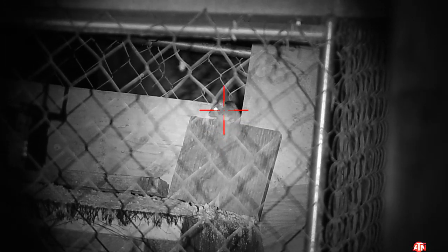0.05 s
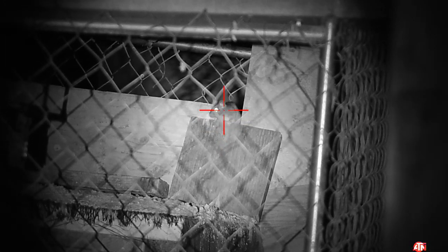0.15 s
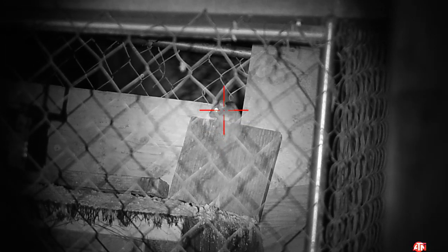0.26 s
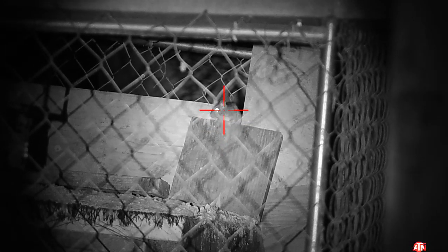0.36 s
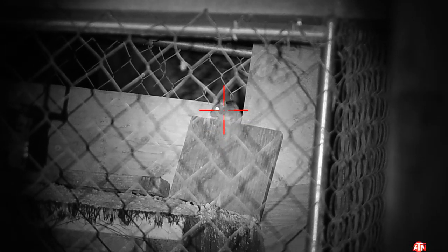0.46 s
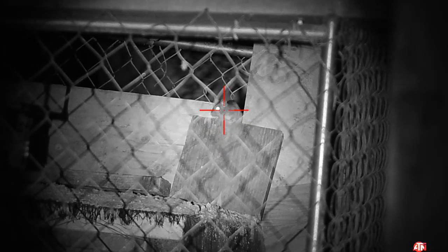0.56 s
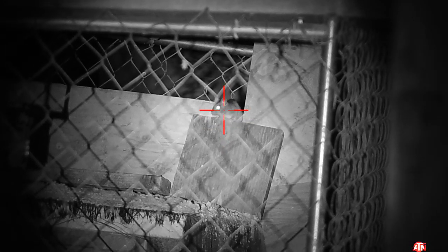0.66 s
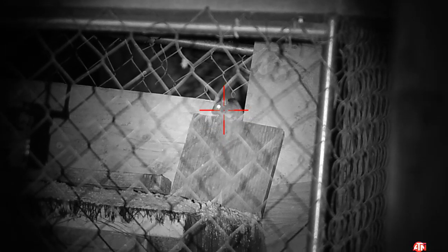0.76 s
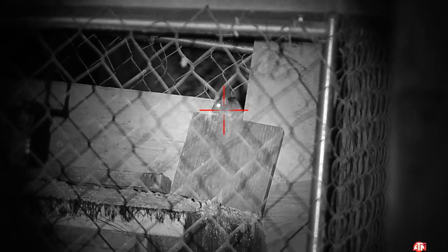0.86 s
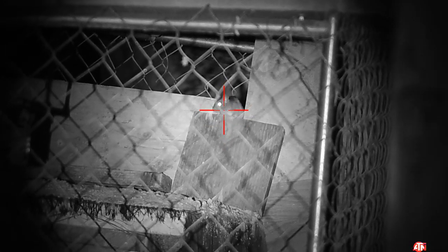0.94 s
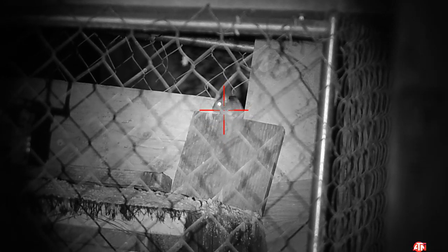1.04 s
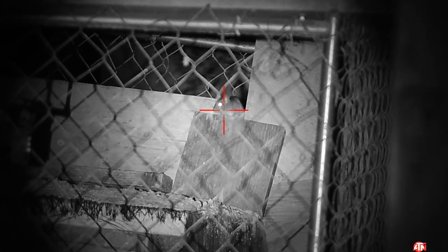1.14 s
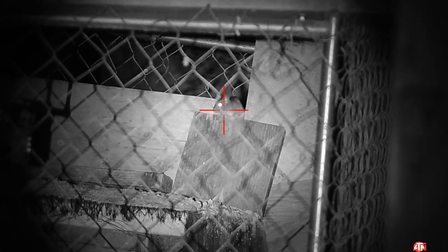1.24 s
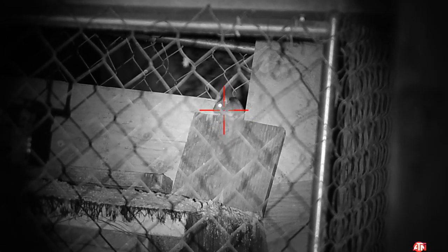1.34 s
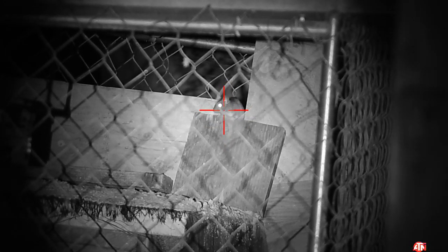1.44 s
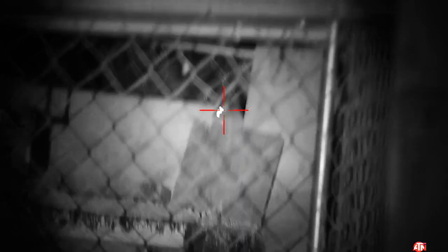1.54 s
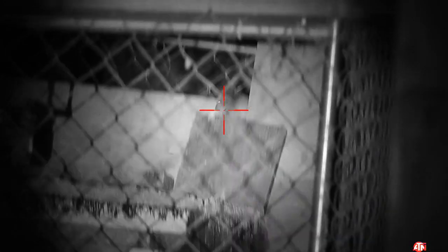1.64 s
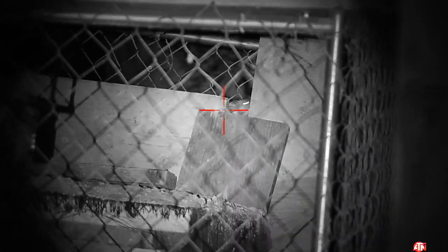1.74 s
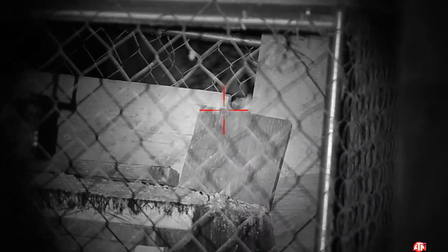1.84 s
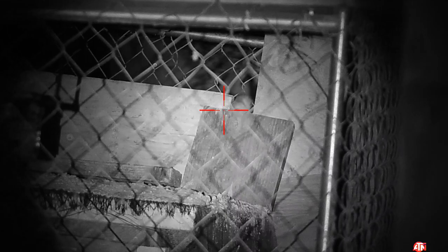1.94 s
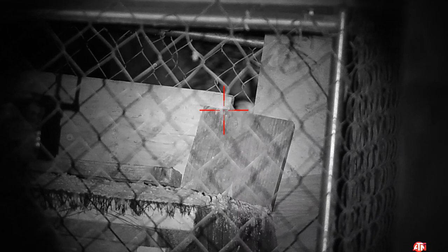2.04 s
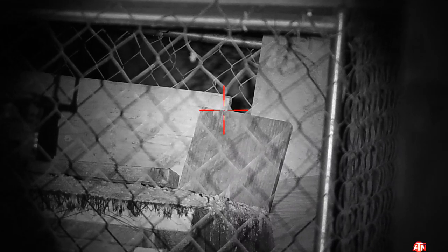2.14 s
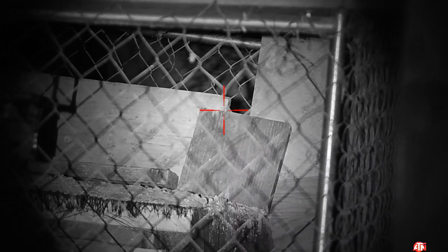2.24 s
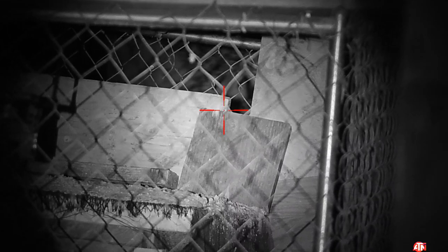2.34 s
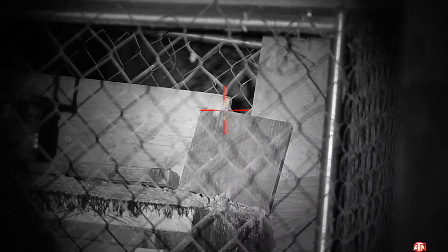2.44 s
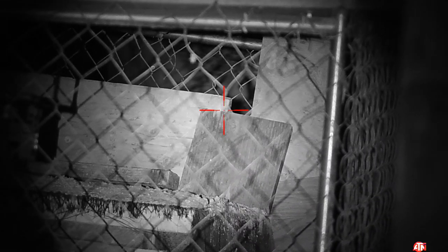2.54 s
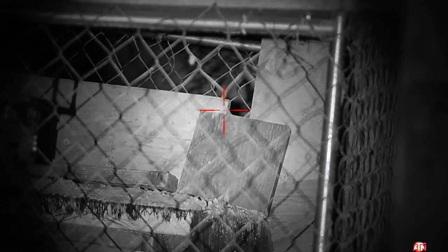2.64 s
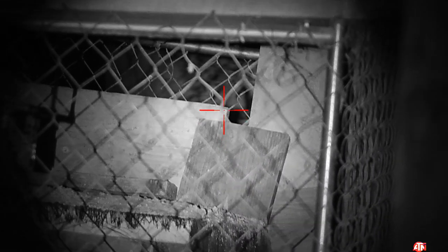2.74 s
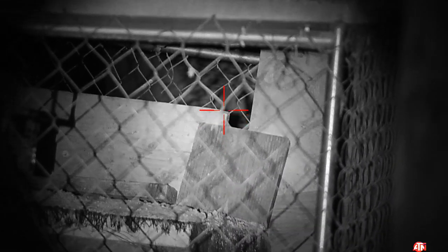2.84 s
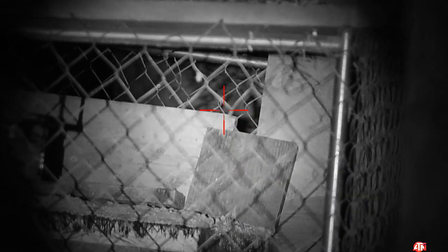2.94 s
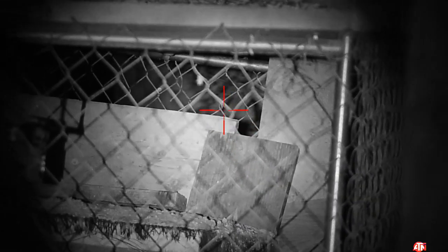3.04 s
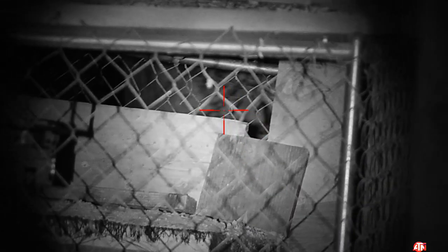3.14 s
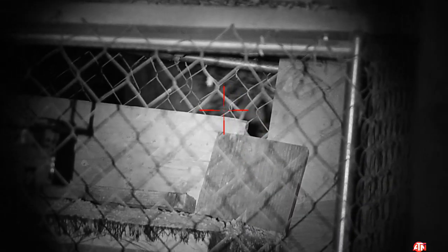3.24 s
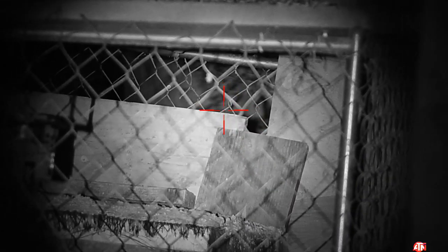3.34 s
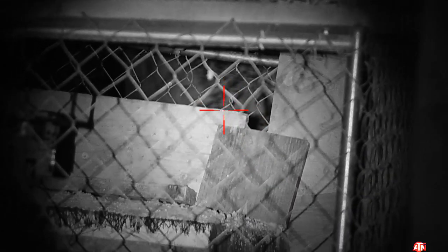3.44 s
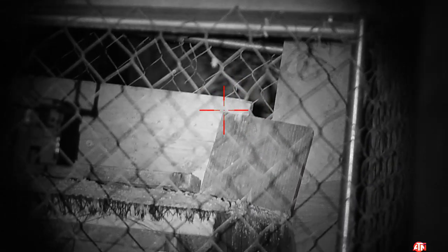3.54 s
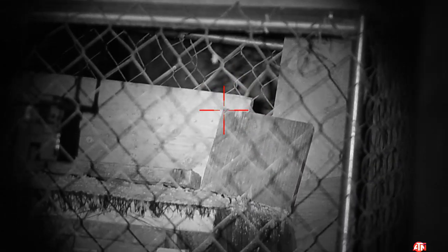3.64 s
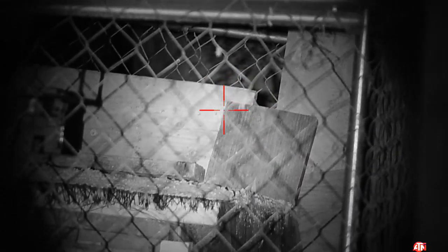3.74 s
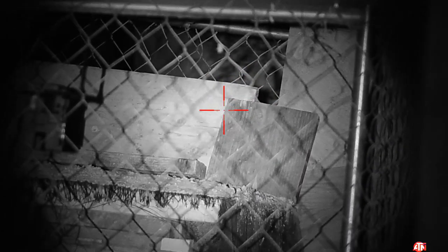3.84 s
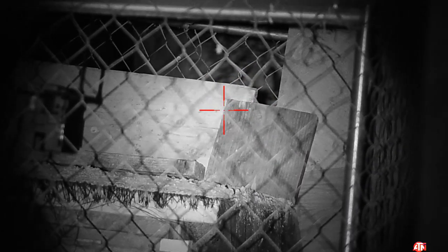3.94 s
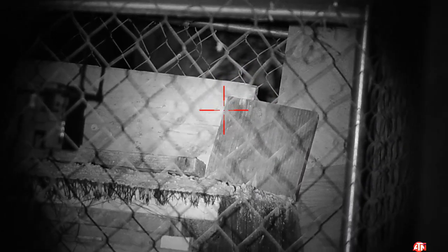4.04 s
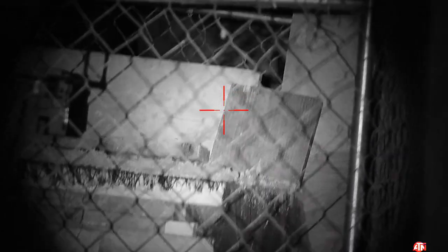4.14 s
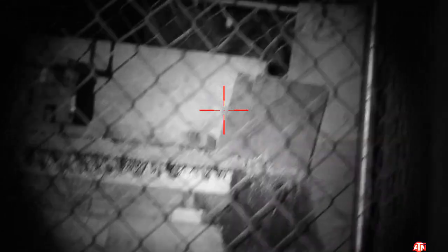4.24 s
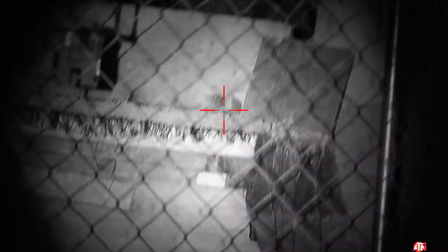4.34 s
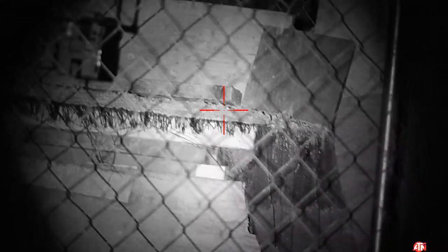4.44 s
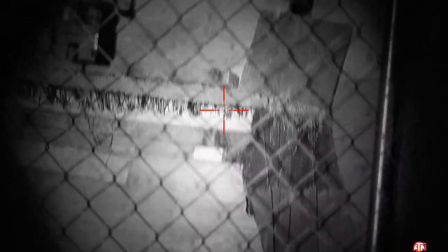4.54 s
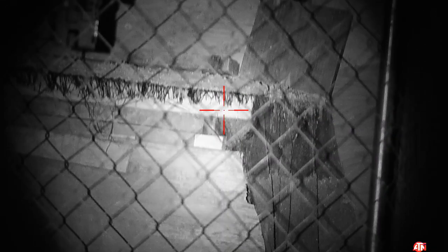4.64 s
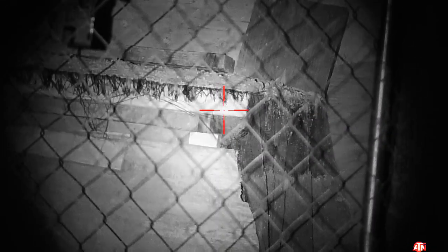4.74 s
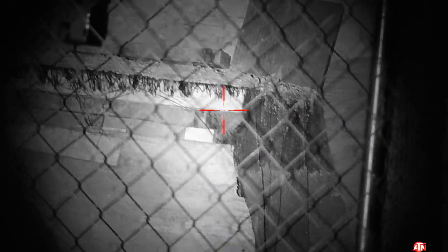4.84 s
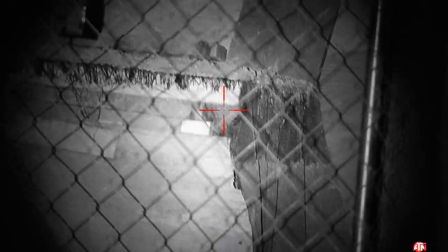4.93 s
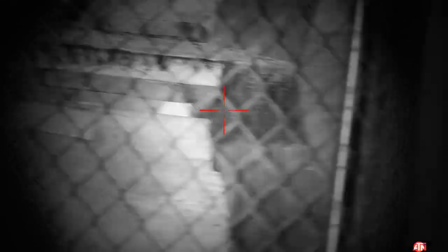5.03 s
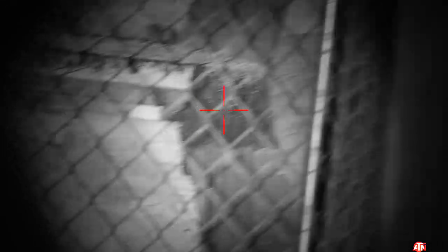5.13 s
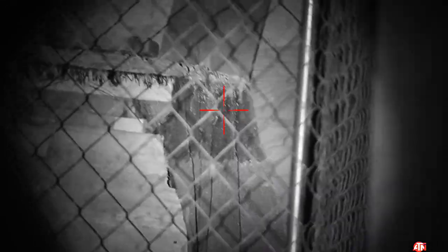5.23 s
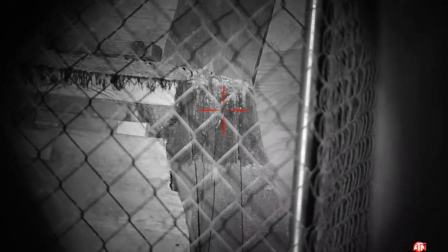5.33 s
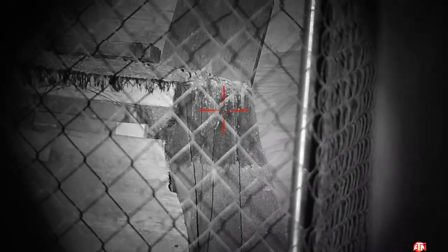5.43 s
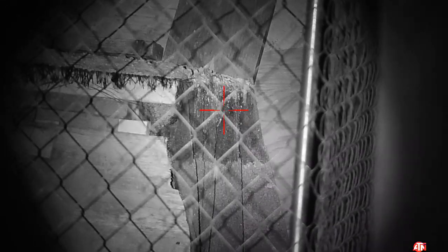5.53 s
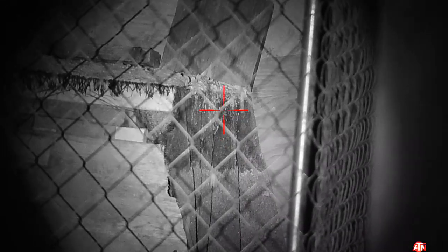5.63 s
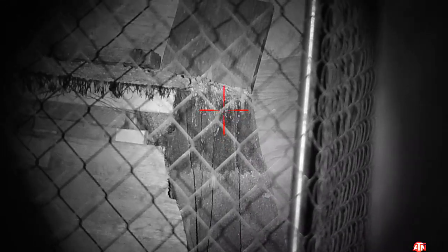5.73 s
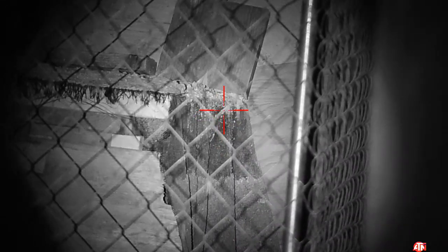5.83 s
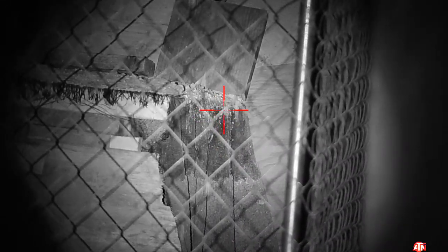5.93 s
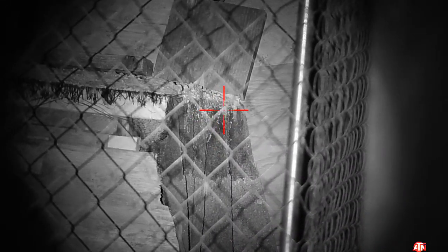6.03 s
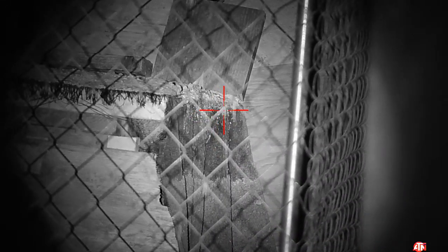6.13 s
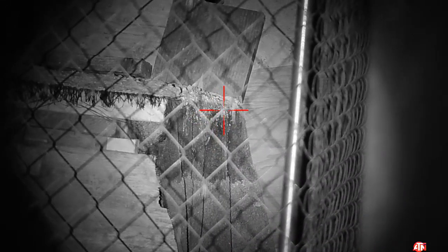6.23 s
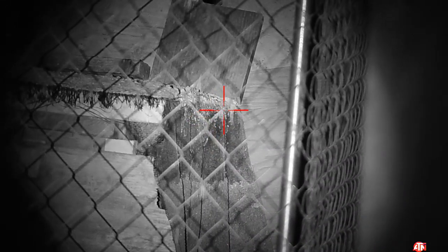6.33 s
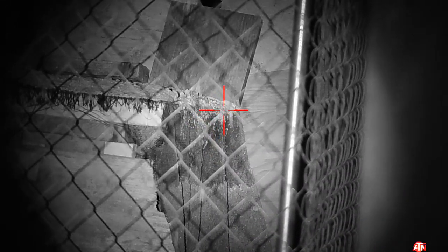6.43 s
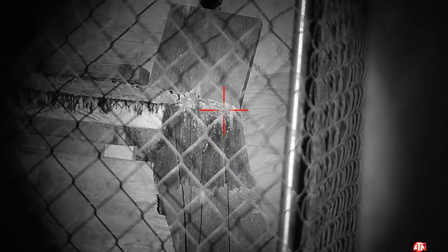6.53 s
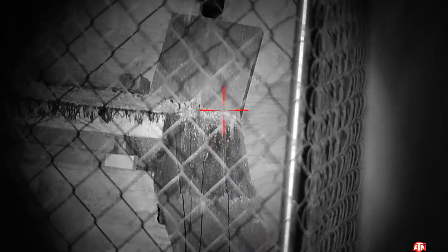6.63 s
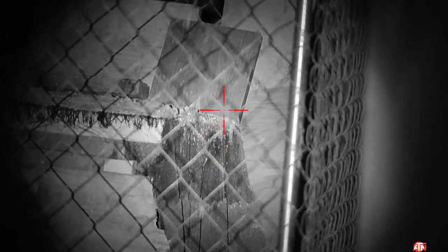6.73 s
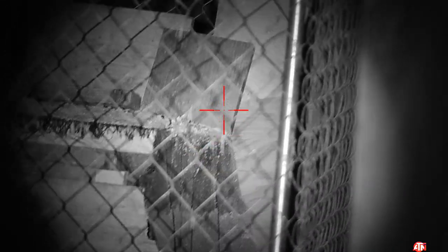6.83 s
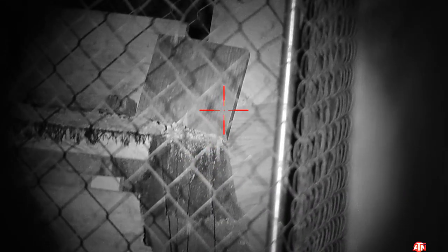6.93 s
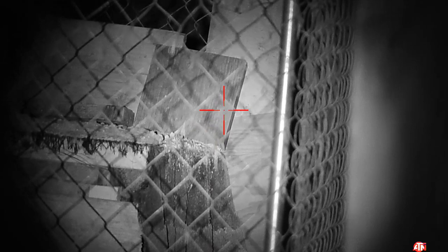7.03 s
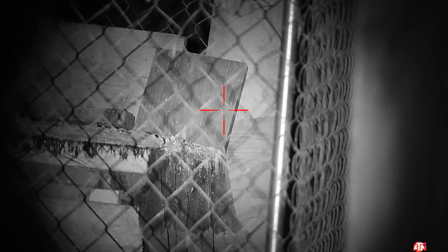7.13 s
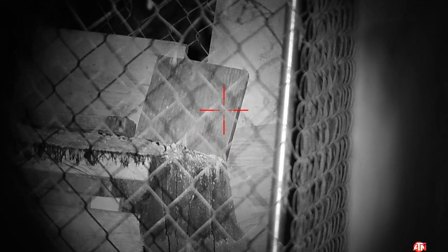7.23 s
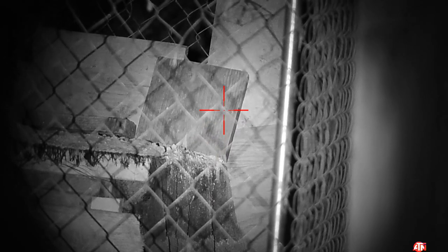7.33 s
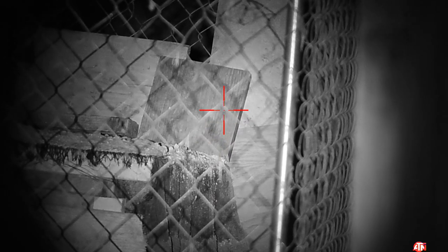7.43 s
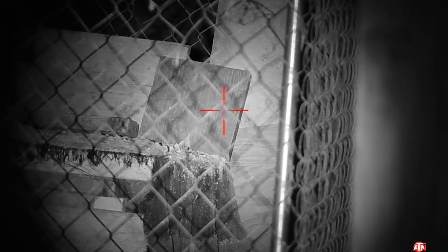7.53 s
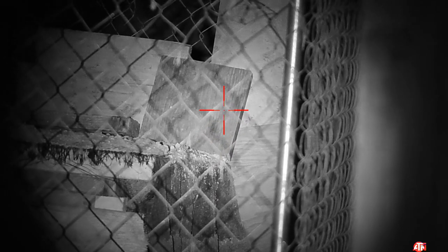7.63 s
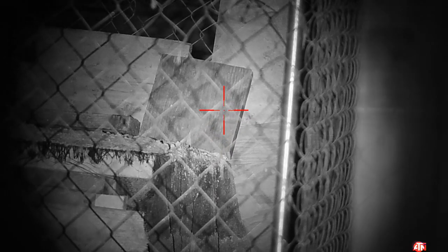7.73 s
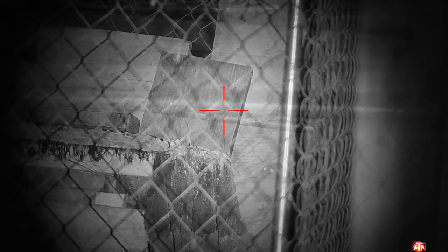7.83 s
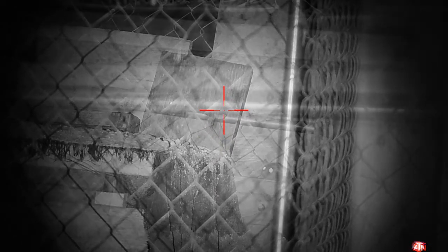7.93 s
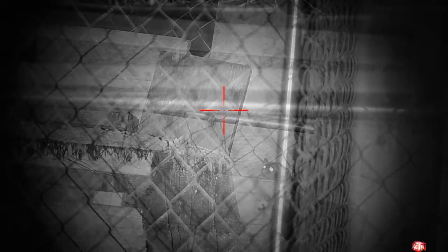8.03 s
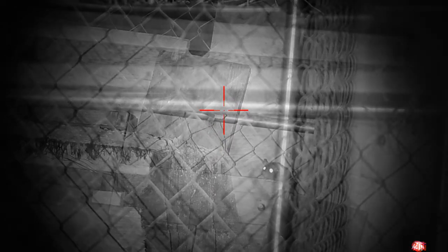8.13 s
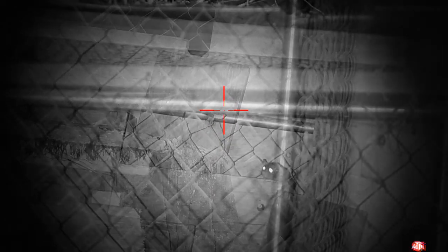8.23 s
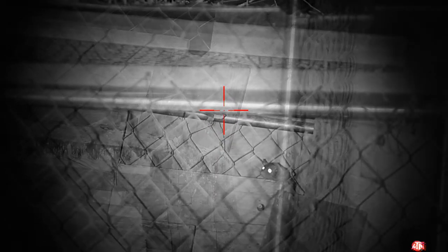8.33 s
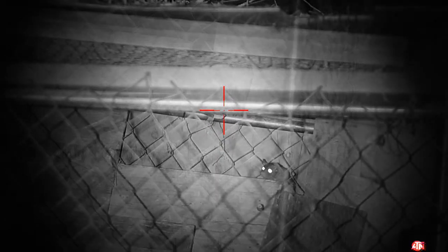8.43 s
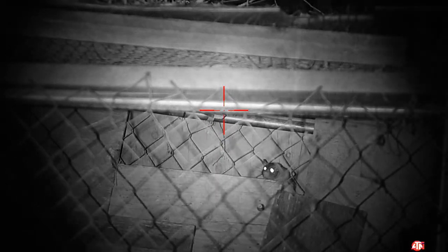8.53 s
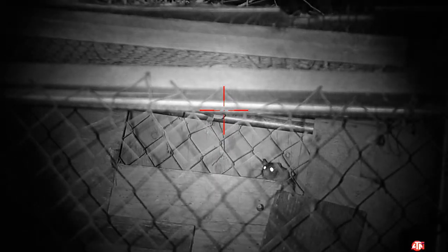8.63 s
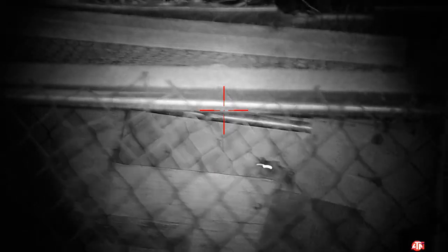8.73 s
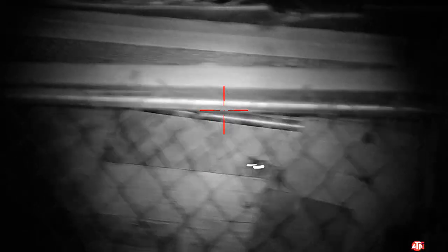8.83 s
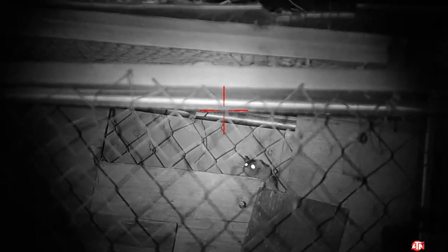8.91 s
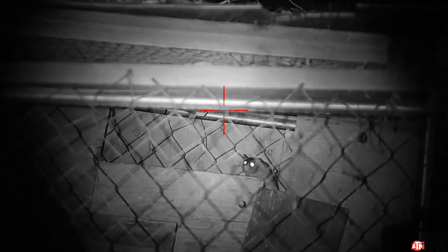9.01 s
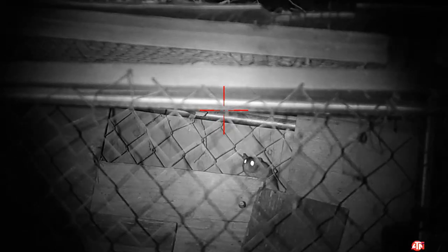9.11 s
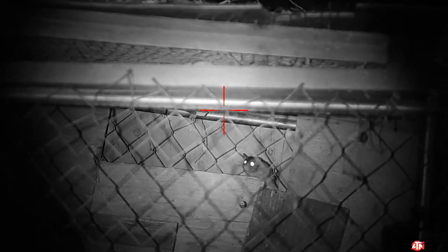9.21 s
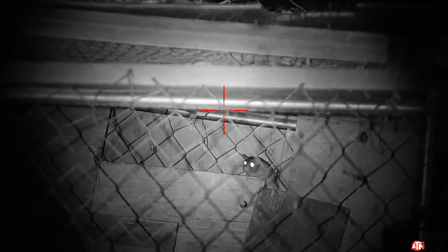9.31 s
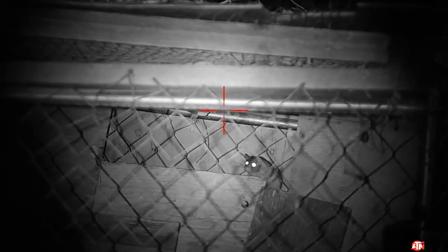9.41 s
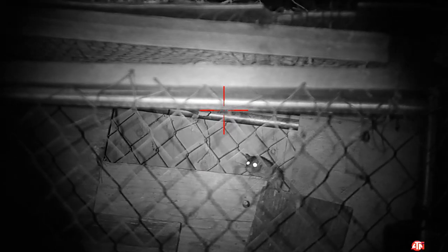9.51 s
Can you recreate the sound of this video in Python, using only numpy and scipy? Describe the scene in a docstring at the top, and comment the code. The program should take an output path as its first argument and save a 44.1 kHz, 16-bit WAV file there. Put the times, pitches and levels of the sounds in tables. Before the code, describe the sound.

One sharp air rifle shot with a brief metal rattle and a soft echo, over crickets chirping steadily at night.

```python
"""Crickets chirp and trill in a farmyard at night, each wing stroke a short tone; two katydids rasp
out of step. At 1.7 s an air rifle fires: a sharp crack of released air, then a short steel rattle as
the hammer bounces ever faster. Echo from the surroundings swells and dies with two faint ringing tones.
The insects carry on throughout, over night air and a few soft knocks."""
import sys
import numpy as np
from scipy import signal
from scipy.fft import rfft, irfft, next_fast_len
from scipy.io import wavfile

SR = 44100
rng = np.random.default_rng(int(sys.argv[2]) if len(sys.argv) > 2 else 0)


def wrap_up_sound(samples):
    """Save the sound to the file named by the first command line argument, as 16-bit audio."""
    columns = np.atleast_2d(samples).T
    # keep every value between -1 and 1, then stretch to whole-number steps
    tamed = np.clip(columns, -1, 1)
    steps = np.round(tamed * 32767).astype(np.int16)
    wavfile.write(sys.argv[1], SR, steps)


N = 422037
TIME = np.arange(N) / SR

# hammer and valve blows (time [s], level [dB], dull crack re ring [dB])
ACTION_BLOWS = [(1.7111, -24, 2), (1.7152, -17.5, -24), (1.7185, -18, 1.5), (1.924, -38, -19)]
# rifle modes (frequency [Hz], width [Hz], relative level [dB])
STEEL_MODES = [(4436, 310, 1), (4810, 380, -10), (5780, 440, -6.5), (7040, 370, -16.5), (9900, 240, -21.5)]
# crack (frequency [Hz], relative level [dB])
CRACK_SPECTRUM = [(150, -37.5), (330, -18.5), (680, -0.5), (1000, -6), (1450, -2), (2100, -6.5), (3200, -3),
                  (4400, 0.5), (5600, 0.5), (6500, -2), (7500, -4), (8500, -7.5), (11000, -12.5),
                  (16000, -31)]
# echo (frequency [Hz], relative level [dB])
ECHO_SPECTRUM = [(150, -28), (330, -2.5), (600, -3.5), (1200, -2.5), (2400, 2.5), (4400, 3.5), (5500, -9.5),
                 (7000, -22.5), (10000, -34)]
# tones in the echo (pitch [Hz], peak time [s], level [dB], fade [dB/s])
ECHO_TONES = [(377, 2.03, -61.5, 90), (1020, 2.13, -52, 76)]
# field cricket by the sheds (first stroke [s], strokes [count], level before trim [dB])
CLEAR_SONG = [(.461, 2, -41.5), (.93, 2, -42), (1.865, 2, -43), (2.313, 3, -42), (2.783, 3, -42.5),
              (3.232, 3, -44), (3.854, 3, -42.5), (4.64, 3, -41), (5.189, 3, -43), (5.801, 2, -42.5),
              (6.252, 2, -42.5), (6.771, 3, -42.5), (7.864, 3, -42), (8.352, 3, -42), (8.814, 3, -42)]
# cricket in the open (first stroke [s], strokes [count], level [dB], growth [dB/stroke], overtone [dB])
BUZZY_SONG = [(.155, 3, -49.5, -0.5, -24), (.373, 2, -49.5, 3, -11), (.569, 2, -49.5, -1, -24),
              (.86, 2, -49, 1, -22), (1.026, 1, -45.5, 0, -28), (1.243, 3, -51.5, 2, -22),
              (1.378, 2, -46.5, 0, -9.5), (3.59, 2, -49, 0, -18), (4.941, 2, -47.5, 4, -11),
              (5.054, 2, -42, 3, -25), (5.573, 3, -49, 0, -11), (7.088, 3, -51.5, 4, -14),
              (7.69, 1, -43, 0, -25), (7.967, 1, -43, 0, -24), (8.435, 2, -43, 0, -22),
              (8.983, 2, -49, 0, -13), (9.247, 3, -43.5, 5.5, -20)]
# unbroken trills (rate [strokes/s], pitch [Hz], fall [Hz], stroke length [s], level [dB],
# tempo wander [ratio], flutter [dB], reflections [dB])
TRILL_VOICES = [(80.3, 6140, 700, 0.01, -57, .004, 0.86, -10.5),
                (49.66, 3945, 130, 0.015, -60, .004, 1.5, -10.5),
                (47.2, 3740, 460, .017, -68, .03, 1.5, -4.5), (40, 2600, 150.7, .02, -76, .06, 3., -3.5)]
# tree cricket pace (time [s], chirp period [s])
TREE_PACE = [(1.8, .3715), (3.0, .3797)]
# high crickets (rate [pips/s], top pitch [Hz], pitch arch [Hz], level [dB])
HIGH_VOICES = [(13.1, 7305, 120, -73), (14, 7060, 380, -68)]
# katydids (start phase [cycles], level [dB])
KATYDID_VOICES = [(.2, -58.5), (.34, -60.4)]
# katydid pace (time [s], first [rasps/s], second [rasps/s])
KATYDID_PACE = [(0.0, 13.13, 11.72), (1.9, 12.45, 11.61), (3.8, 12.37, 11.6), (5.7, 13.35, 11.64),
                (7.6, 13.25, 11.32), (9.5, 13.14, 11.9)]
# katydid rasp (frequency [Hz], relative level [dB])
RASP_SPECTRUM = [(7500, -33), (9000, -15.5), (10000, -7), (11000, -2), (12500, -1), (14000, 0.5),
                 (15200, -2), (16000, -8)]
# taps and bumps (time [s], level before trim [dB], centre [Hz], decay [s])
KNOCK_EVENTS = [(.193, -58.5, 1800, 0.01), (.446, -68.5, 1500, 0.015), (.53, -70, 2000, 0.028),
                (1.33, -69, 50, 0.061), (2.612, -61.5, 383, 0.017), (5.15, -54.5, 80, .03),
                (5.236, -54, 65, 0.024), (5.48, -69.5, 55, 0.065), (5.84, -60.5, 70, 0.029),
                (6.24, -73, 50.1, .1), (7.94, -73, 69.6, 0.2), (9.39, -71, 50.1, 0.064)]
# far insect bands (centre [Hz], width [Hz], level [dB])
CHORUS_BANDS = [(3628, 460, -67.5), (3986, 260, -65), (4650, 500, -67), (5380, 870, -64.5),
                (6170, 740, -62), (6990, 500, -69), (8020, 380, -75), (9450, 400, -79)]
# puffs of lisping hiss (peak time [s], level [dB])
LISP_PUFFS = [(3.07, -62), (3.35, -59), (3.49, -60), (3.63, -59)]
# night air (frequency [Hz], relative level [dB])
AIR_SPECTRUM = [(20, -34), (40, -23), (65, -7), (110, 1.5), (160, -4), (250, -11), (500, -15), (1000, -18),
                (2000, -19), (5000, -14), (9000, -13), (12000, -11.5), (15500, -17.5)]


def rifle(low_cut_hz=325, squeak_hz=3020, squeak_db=-58, lead_in_hiss_db=-52):
    """A faint squeak over a soft rising hiss, then the shot; the small bore radiates no bass."""
    out = muzzle() + action()
    add(out, 1.663, amp(squeak_db) * stroke(squeak_hz, fall_hz=-150, length_s=.046))
    rise = np.sqrt(np.linspace(0, 1, round(.058 * SR)))
    add(out, 1.653, amp(lead_in_hiss_db) * rise * coloured(CRACK_SPECTRUM)[:len(rise)])
    return signal.sosfilt(signal.butter(6, low_cut_hz, "high", fs=SR, output="sos"), out)


def muzzle(at_s=1.7121, crack_db=-12.5, length_s=.00304, push_db=-8, push_hz=1000, push_s=.00046,
           whistle_hz=7400, whistle_db=-13.5):
    """Air burst: one pressure swing, then brief jet noise that whistles in the muzzle."""
    t, out = np.arange(SR // 20) / SR, np.zeros(N)
    envelope = (1 - np.exp(-t / .0002)) * np.exp(-(t / length_s) ** 4)
    phase = np.angle(rfft(coloured(CRACK_SPECTRUM)[:len(t)] * envelope))
    magnitude = spectrum_gain(CRACK_SPECTRUM, np.fft.rfftfreq(len(t), 1 / SR))
    jet = irfft(magnitude * np.exp(1j * phase), len(t)) * np.sqrt(envelope)  # fills every band
    add(out, at_s, amp(crack_db) * jet * np.linalg.norm(envelope) / np.linalg.norm(jet))
    from_peak_s = t - 2 * push_s
    push = np.exp(-(from_peak_s / push_s) ** 2) * np.cos(2 * np.pi * push_hz * from_peak_s)
    add(out, at_s - .0004, -amp(push_db) * push)
    add(out, at_s + .00066, amp(whistle_db) * stroke(whistle_hz, 0, length_s))
    return out


def action(hard_rise_s=.00059, hard_db=-18, softening=.35, contact_s=.0024, scrape_db=-13):
    """Hammer and valve strike, then chatter; all ring the same steel, weak blows with a rounder attack."""
    t, out, crack = np.arange(SR // 20) / SR, np.zeros(N), coloured(CRACK_SPECTRUM)
    touch = np.exp(-(t / contact_s) ** 2)
    for s, db, dull_db in ACTION_BLOWS + bounces():
        rise_s = hard_rise_s * amp(softening * (hard_db - db))
        onset = 1 - np.exp(-(t / rise_s) ** 2)
        phases = 2 * np.pi * rng.random(len(STEEL_MODES))
        ring = sum(amp(mode_db) * np.exp(-np.pi * width_hz * t) * np.sin(2 * np.pi * hz * t + phase)
                   for (hz, width_hz, mode_db), phase in zip(STEEL_MODES, phases))
        scrape = signal.fftconvolve(touch * rng.standard_normal(len(t)), ring)[:len(t)]
        dull = touch * crack[round(s * SR):][:len(t)]
        blow = unit(onset * ring) + amp(scrape_db) * unit(scrape) + amp(dull_db) * unit(dull)
        add(out, s, amp(db) * blow * np.sqrt(contact_s / t[-1]))
    return out


def bounces(start_s=1.7312, gap_s=.0072, shrink=.877, top_db=-33.3, ends_db=-3.5, dull_db=-18, count=10):
    """Quickening hammer bounces, strongest mid-run; rows as in ACTION_BLOWS."""
    gaps_s = gap_s * shrink ** np.arange(count)
    times_s = start_s + np.cumsum(gaps_s) - gaps_s
    return [(s, top_db + ends_db * u ** 2, dull_db) for s, u in zip(times_s, np.linspace(-1, 1, count))]


def echo(start_s=1.757, peak_s=2.165, peak_db=-41.5, ground_db=-51,
         thin_until_s=2.13, filling_s=.17, dulling_s=.38, patchy_db=.85):
    """The shot returns off nearby ground, then ever more surfaces; late returns lose their treble."""
    wash = coloured(ECHO_SPECTRUM)
    near = np.clip((thin_until_s - TIME) / filling_s, 0, 1)  # thin returns off grass and wire
    wash = np.sqrt(1 - near) * wash + np.sqrt(near) * unit(band(coloured(ECHO_SPECTRUM), 800, 9000))
    far = np.clip((TIME - thin_until_s) / dulling_s, 0, 1)
    wash = np.sqrt(1 - far) * wash + np.sqrt(far) * unit(band(coloured(ECHO_SPECTRUM), 216, 2230))
    shot_s = ACTION_BLOWS[0][0]
    ground = amp(ground_db) * swell(shot_s, shot_s + .0101, fade_db_per_s=190)
    surfaces = amp(peak_db) * swell(start_s, peak_s, fade_db_per_s=57.5)
    tones = sum(amp(db) * swell(start_s, s, fade) * np.sin(2 * np.pi * hz * TIME)
                for hz, s, db, fade in ECHO_TONES)
    return wash * (ground + surfaces) * amp(patchy_db * drift(180)) + np.sqrt(2) * tones


def clear_cricket(trim_db=-1.57, gap_s=.041, length_s=.022, hz=4705, fall_hz=210, waver_hz=20,
                  first_sharp_hz=55, first_db=-.2, rough_db=1, wall_s=.018, wall_db=-14, wet_db=-5):
    """Two or three strokes that sag as they end, the first sharper; the sheds throw them back."""
    out = np.zeros(N)
    for start_s, strokes, db in CLEAR_SONG:
        for k, detune in enumerate(rng.standard_normal(round(strokes))):
            first = k == 0
            sharp_hz = first_sharp_hz * first
            pip = stroke(hz + sharp_hz + waver_hz * detune, fall_hz + 2 * sharp_hz, length_s,
                         overtone_db=-33, taper=.57, sag_hz=380)
            pip *= amp(db + trim_db + first_db * first)
            s = start_s + k * gap_s - length_s / 2
            add(out, s, pip)
            add(out, s + wall_s, amp(wall_db) * pip)
    out *= amp(rough_db * drift(1200))
    return out + amp(wet_db) * scatter(out, t60_s=.29)


def buzzy_cricket(gap_s=.044, hz=4830, fall_hz=520, length_s=.02, wet_db=-11):
    """Steeply falling strokes, often growing through the chirp."""
    out = np.zeros(N)
    for start_s, strokes, mean_db, growth_db, overtone_db in BUZZY_SONG:
        for k in range(round(strokes)):
            db = mean_db + growth_db * (k - (round(strokes) - 1) / 2)
            pip = stroke(hz, fall_hz, length_s, overtone_db, taper=.52)
            add(out, start_s + k * gap_s - length_s / 2, amp(db) * pip)
    return out + amp(wet_db) * scatter(out, t60_s=.2)


def far_crickets(period_s=.55, gap_s=.044, hz=4850, level_db=-59.5, spread_db=3, wet_db=-3, count=3):
    """Distant neighbours: soft chirps of four uneven strokes at loose intervals."""
    out = np.zeros(N)
    for _ in range(count):
        draws = rng.standard_normal((40, 8))
        starts_s = period_s * (np.arange(len(draws)) - rng.random() + .25 * draws[:, 0])
        for s, (sharp, loud, slow, *uneven) in zip(starts_s, draws[:, 1:]):
            pip = stroke(hz + 125 * sharp, fall_hz=600, length_s=.023)
            pip *= amp(level_db + spread_db * np.tanh(loud))
            for k, gain in enumerate(amp(spread_db * np.tanh(uneven))):
                add(out, s + k * gap_s * (1 + .092 * slow), gain * pip)
    return out + amp(wet_db) * scatter(out, t60_s=.24)


def trilling_crickets():
    """One stroke repeated without pause, at a slightly wandering tempo."""
    out = np.zeros(N)
    for rate_hz, hz, fall_hz, length_s, db, wander, flutter_db, wet_db in TRILL_VOICES:
        count = np.floor(np.cumsum(rate_hz * (1 + wander * drift(7))) / SR)
        impulses = np.diff(count, prepend=0) * amp(flutter_db * drift(18))
        song = amp(db) * unit(signal.oaconvolve(impulses, stroke(hz, fall_hz, length_s))[:N])
        out += song + amp(wet_db) * scatter(song, t60_s=.15)
    return out


def tree_cricket(rate_hz=52, chirp_s=.155, hz=2505, level_db=-63.5, wet_db=-6):
    """Low, even chirps of wing strokes with a soft start; the pace eases a little, then holds."""
    out, start_s = np.zeros(N), -.03
    while start_s < N / SR:
        draws = rng.standard_normal((20, 3))
        for s, (late, sharp, loud) in zip(np.arange(start_s, start_s + chirp_s, 1 / rate_hz), draws):
            warm_up = 1 - np.exp(-1 - (s - start_s) * rate_hz)
            pip = stroke(hz + 22 * sharp, fall_hz=220, length_s=.019)
            add(out, s + .001 * late, warm_up * amp(level_db + 1.5 * loud) * pip)
        start_s += np.interp(start_s, *np.transpose(TREE_PACE))
    return out + amp(wet_db) * scatter(out, t60_s=.096)


def high_crickets(wet_db=-8, wander=.03):
    """Thin pips whose pitch arches with wing speed."""
    out = np.zeros(N)
    for rate_hz, top_hz, arch_hz, db in HIGH_VOICES:
        speed = wing_beat(rate_hz * (1 + wander * drift(2)), rng.random())
        pitch_hz = top_hz - arch_hz * (1 - speed) + 35 * drift(60)
        tone = np.sin(2 * np.pi * np.cumsum(pitch_hz) / SR)
        out += amp(db + 1.8 * drift(4.1)) * unit(speed ** 4 * tone)
    return out + amp(wet_db) * scatter(out, t60_s=.15)


def katydids(sharpness=1.7, rest=.24, grain_db=1.5, uneven_db=.9, swell_db=.8):
    """Two toothy rasps drifting in and out of step."""
    out = np.zeros(N)
    times_s, *paces_hz = np.transpose(KATYDID_PACE)
    for pace_hz, (start_cycles, db) in zip(paces_hz, KATYDID_VOICES):
        speed = wing_beat(np.interp(TIME, times_s, pace_hz), start_cycles)
        flutter_db = grain_db * drift(370) + uneven_db * drift(25) + swell_db * drift(1.4)
        pressure = (rest + speed ** sharpness) * amp(flutter_db)
        out += amp(db) * unit(pressure * coloured(RASP_SPECTRUM))
    return out


def knocks(trim_db=4.5):
    """Small dull contacts: fast-decaying noise puffs."""
    t, out = np.arange(SR // 2) / SR, np.zeros(N)
    for s, db, hz, decay_s in KNOCK_EVENTS:
        puff = unit(band(rng.standard_normal(len(t)), hz / 1.62, hz * 1.6))
        envelope = np.exp(-t / decay_s) * (1 - np.exp(-t * hz))
        add(out, s, amp(db + trim_db) * puff * envelope)
    return out


def night(air_db=-65, flutter_db=1.74, lisp_rise_s=.09):
    """Rumble and hiss, far insects blurred into bands, a brief lisping."""
    chorus = sum(amp(db + flutter_db * drift(70)) * noise(lambda f: np.exp(-2 * ((f - hz) / width) ** 2))
                 for hz, width, db in CHORUS_BANDS)
    air = amp(air_db) * coloured(AIR_SPECTRUM)
    puffs = sum(amp(db) * swell(s - lisp_rise_s, s, fade_db_per_s=250) for s, db in LISP_PUFFS)
    lisp = puffs * unit(band(rng.standard_normal(N), 7600, 9300))
    return air + chorus + lisp


def stroke(hz, fall_hz, length_s, overtone_db=-29, taper=.66, sag_hz=0):
    """Gliding tone. In a wing stroke the file slows, so the pitch sinks, and may sag at the end."""
    u = np.linspace(0, 1, round(length_s * SR))
    phase = 2 * np.pi * np.cumsum(hz - fall_hz * (u - .5) - sag_hz * u ** 6) / SR
    tone = np.sin(phase) + amp(overtone_db) * np.sin(2 * phase)
    return np.sqrt(2) * signal.windows.tukey(len(u), taper) * tone


def wing_beat(rate_hz, start_cycles):
    """Smooth 0-1 rise and fall, once a stroke."""
    return .5 + .5 * np.cos(2 * np.pi * (np.cumsum(rate_hz) / SR + start_cycles))


def scatter(x, t60_s):
    """Reflections off ground, fence and sheds: sparse decaying taps."""
    t = np.arange(SR // 2) / SR
    taps = rng.standard_normal(len(t)) * (rng.random(len(t)) < 2000 / SR)
    taps *= amp(-60 * t / t60_s) * (t > .003)
    return signal.oaconvolve(x, taps / np.linalg.norm(taps))[:N]


def swell(start_s, peak_s, fade_db_per_s):
    """Linear rise to 1, exponential fade."""
    rise = np.clip((TIME - start_s) / (peak_s - start_s), 0, 1)
    return rise * amp(-fade_db_per_s * np.maximum(TIME - peak_s, 0))


def noise(gain_at):
    """Noise of rms 1, shaped by a function of frequency."""
    size = next_fast_len(N, True)
    spectrum = rfft(rng.standard_normal(size)) * gain_at(np.fft.rfftfreq(size, 1 / SR))
    return unit(irfft(spectrum, size)[:N])


def spectrum_gain(points, at_hz):
    """Gain from (Hz, dB) points, joined in log frequency."""
    hz, db = np.transpose(points)
    return amp(np.interp(np.log(at_hz + 1), np.log(hz), db))


def coloured(points):
    """Noise of rms 1, shaped by (Hz, dB) points."""
    return noise(lambda f: spectrum_gain(points, f))


def drift(rate_hz):
    """Random wander of rms 1."""
    knots_s = np.arange(0, N / SR + 1, 1 / rate_hz)
    return unit(np.interp(TIME, knots_s, rng.standard_normal(len(knots_s))))


def band(x, lo_hz, hi_hz):
    """Causal band-pass."""
    return signal.sosfilt(signal.butter(2, [lo_hz, hi_hz], "band", fs=SR, output="sos"), x)


def amp(db):
    """Decibels to gain."""
    return 10 ** (np.asarray(db) / 20)


def unit(x):
    """Scales to rms 1."""
    return x / np.sqrt(np.mean(x ** 2) + 1e-20)


def add(mix, at_s, sound):
    """Mixes a sound in at a time."""
    start = round(at_s * SR)
    sound = sound[max(-start, 0):]
    part = mix[max(start, 0):][:len(sound)]
    part += sound[:len(part)]


def scene():
    """The shot over the night insects, mono."""
    crickets = clear_cricket() + buzzy_cricket() + far_crickets()
    crickets += trilling_crickets() + tree_cricket() + high_crickets()
    return (crickets + katydids() + night() + rifle() + echo() + knocks())[None]


def record(dry):
    """Low-pass at 15.8 kHz."""
    return signal.oaconvolve(dry, signal.firwin(511, 15800, window=("kaiser", 8), fs=SR)[None], "same")


dry = scene()
out = record(dry)
wrap_up_sound(out)
```